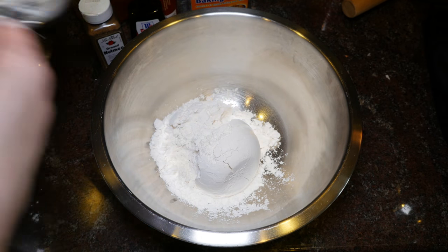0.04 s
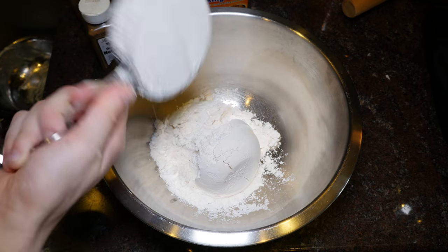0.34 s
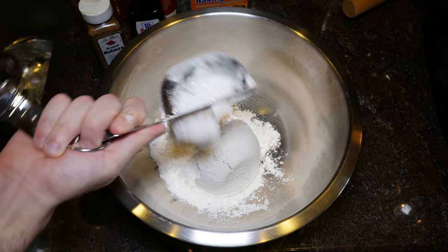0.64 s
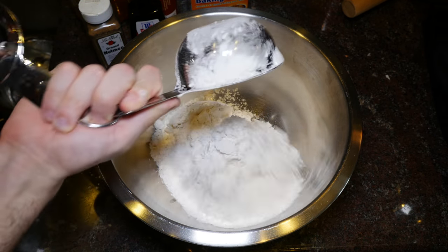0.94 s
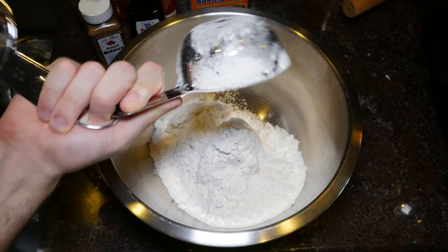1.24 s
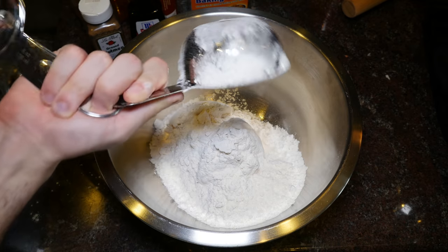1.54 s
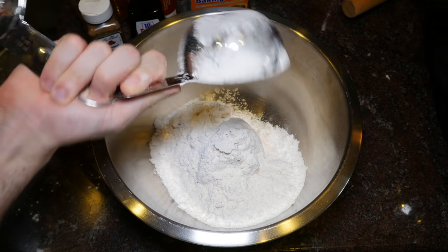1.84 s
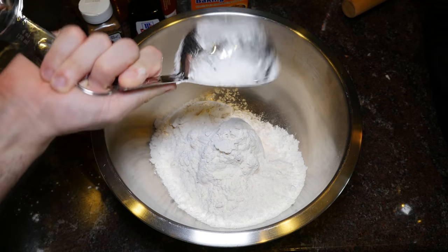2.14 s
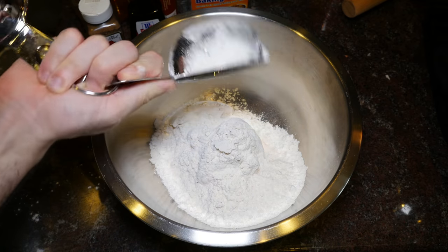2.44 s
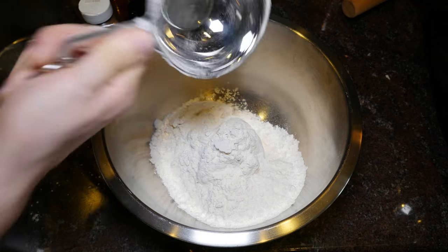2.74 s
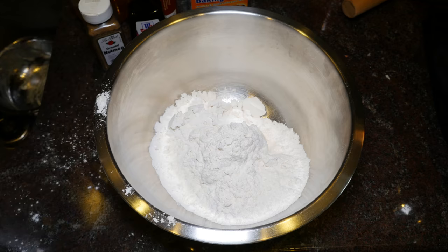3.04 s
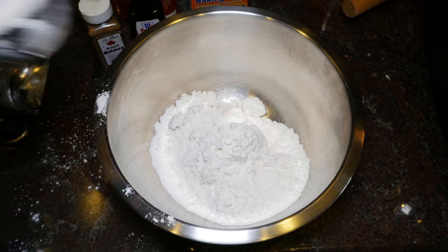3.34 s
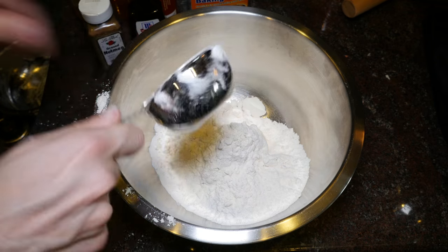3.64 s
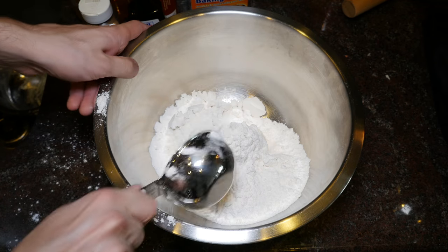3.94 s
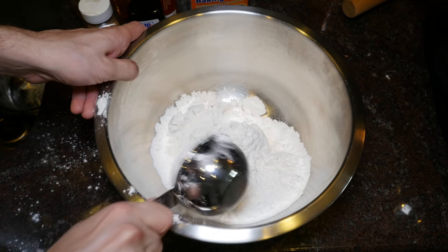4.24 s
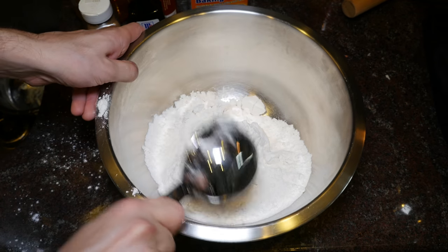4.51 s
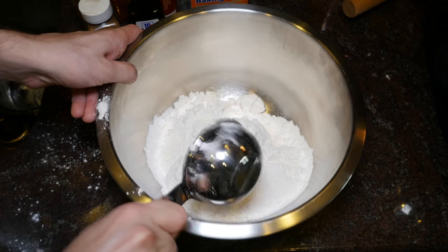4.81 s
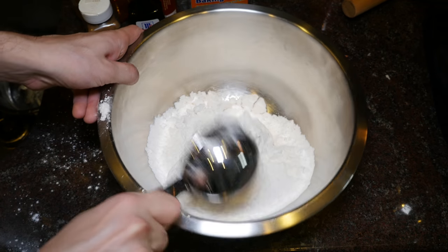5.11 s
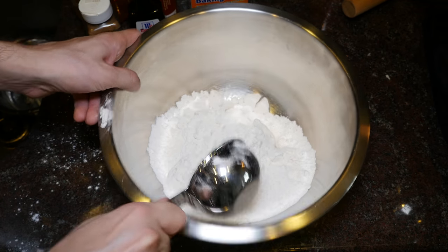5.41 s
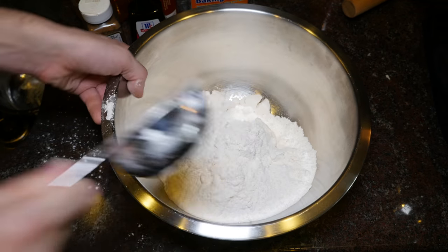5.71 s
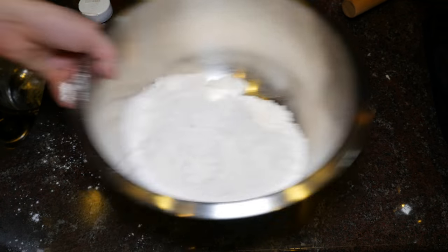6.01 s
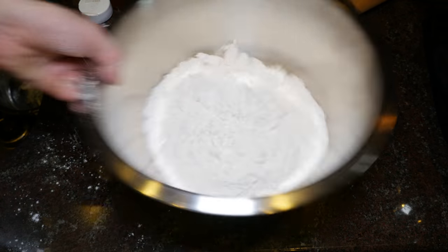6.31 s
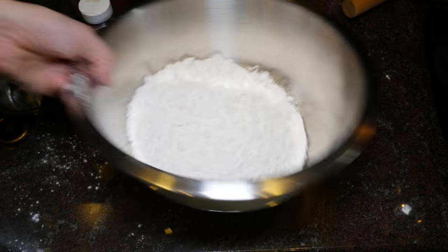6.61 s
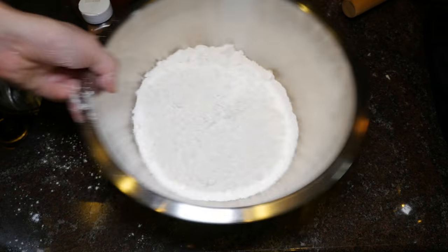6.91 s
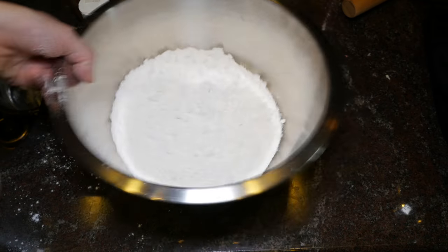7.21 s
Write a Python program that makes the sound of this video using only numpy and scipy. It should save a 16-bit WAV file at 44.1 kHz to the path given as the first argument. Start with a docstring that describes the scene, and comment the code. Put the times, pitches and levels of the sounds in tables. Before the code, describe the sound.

Light clinks of a shaken measuring cup, then fast, loud clanks on a steel bowl and a faint swish of flour.

```python
"""Flour into a steel mixing bowl.

Flour hisses from a metal measuring cup and lands in soft thuds; the cup rattles as it is shaken empty.
A smaller cup raps the rim quickly: the thin wall clanks and rings, damped by a steadying hand.
The bowl rocks back, then is swirled and the flour slides. A fan hums behind it all;
the kitchen echoes the blows, and a limiter ducks under the loud raps."""
import sys
import numpy as np
from scipy import signal
from scipy.io import wavfile
from scipy.ndimage import uniform_filter1d, minimum_filter1d

SR = 44100
rng = np.random.default_rng(int(sys.argv[2]) if len(sys.argv) > 2 else 0)


def dump_mix(stems):
    """Bounce the given channels to the path in sys.argv[1] as a 16-bit WAV at rate SR."""
    frames = np.atleast_2d(stems).T  # one column per channel
    limited = np.clip(frames, -1, 1)  # hard clip at full scale
    pcm = np.round(limited * 32767).astype(np.int16)
    wavfile.write(sys.argv[1], SR, pcm)


N = 328986
TIME = np.arange(N) / SR

# fan air noise: freq_hz, density_db
FAN_SPECTRUM = [(25, -27), (60, -16), (95, -10.5), (150, -8), (240, -1), (400, -4.5), (600, -2), (820, -11),
                (1300, -15), (2300, -22.5), (4200, -29), (7500, -32), (10500, -29), (16000, -38)]
# fan hum: freq_hz, level_db
FAN_HUM = [(57, -75.5), (232, -64.5), (380, -66), (1370, -75.5), (1890, -74.5)]
# fan, left-right: freq_hz, coherence
FAN_COHERENCE = [(60, 1), (300, 0.98), (1000, 0), (3000, 0), (12000, 0.3)]

# kitchen echoes, left-right: freq_hz, coherence
ROOM_COHERENCE = [(100, 1), (300, 1), (600, .3), (1200, .15), (3000, 0.1), (6000, .4), (12000, 0.83)]
# kitchen decay: freq_hz, t60_s
ROOM_DECAY = [(120, .5), (500, 0.51), (1300, 0.48), (4000, 0.62), (9000, 0.44), (15000, 0.53)]
# echo colour: freq_hz, gain_db
ROOM_SPECTRUM = [(100, 0.28), (250, 0.84), (600, 0.97), (1200, 0.073), (2500, 0.98), (5000, 0.96),
                 (10000, 0.15), (15000, 0.19)]

# flour leaving a tilted cup: centre_s, length_s, level_db
POURS = [(0.672, 0.12, -67), (.81, 0.2, -63.5), (0.972, .15, -64.5), (2.707, 0.054, -73),
         (2.833, 0.51, -67), (2.875, 0.048, -59), (3.68, .4, -66), (3.998, 0.37, -65.5)]
# flour hiss: freq_hz, density_db
FLOUR_SPECTRUM = [(1500, -6.5), (3500, -7.5), (5000, -5.5), (6700, 1.5), (8500, -7), (10800, 1.5),
                  (13000, -8.5), (16000, -8.5)]
# falling flour and handling: start_s, level_db
SOFT_BLOWS = [(0.847, -39.5), (2.777, -41), (2.939, -47), (3.048, -49), (7.35, -49)]
# bowl and counter under a soft blow: freq_hz, level_db, t60_s
THUD_MODES = [(150, -11, 0.12), (240, -7.5, 0.11), (290, -2.5, 0.067), (379, -1, 0.061), (574, -11, 0.016)]

# shaken cup clinking at its handle: start_s, tick_db, cup_db
CUP_CLINKS = [(0.7707, -50, -48), (1.2062, -44.5, -64), (1.292, -31.5, -35), (1.3589, -31.5, -51),
              (1.4053, -55, -47.5), (1.4924, -35.5, -55), (1.51, -31.5, -52), (1.552, -54, -48),
              (1.6368, -35.5, -50), (1.647, -31.5, -60), (1.6964, -38, -44.5), (1.7608, -32, -46),
              (1.7938, -31, -55), (1.847, -28, -38.5), (1.8981, -33.5, -49), (1.918, -58, -42.5),
              (1.936, -34.5, -49), (1.9762, -33, -41), (2.0297, -42, -47.5), (2.0672, -33.5, -47),
              (2.108, -38.5, -42), (2.1657, -29, -48.5), (2.2313, -35.5, -46), (2.2964, -26.5, -57),
              (2.354, -43, -44), (2.521, -52, -47.5)]
# cup ring: freq_hz, level_db, t60_s
CUP_MODES = [(1493, -5.5, 0.096), (3090, -9, 0.082), (3195, -8, 0.044), (4660, -8.5, 0.074),
             (6470, -9, 0.06), (8200, -14, 0.054), (12200, -22, 0.062)]
# broad cup resonances: freq_hz, width_hz, gain_db
CUP_RESONANCES = [(1450, 91, 2), (1670, 310, -5.5), (2084, 85, -2.5), (3210, 140, -3), (4800, 80, -6),
                  (6600, 140, -8.5), (8580, 120, -17), (10500, 82, -16)]
# steel-on-steel tick: freq_hz, density_db
TICK_SPECTRUM = [(1200, -5.5), (2200, -3.5), (3300, 0), (4200, 5), (6500, 6.5), (8500, -1.5), (11000, 1.5),
                 (13000, -14), (16000, -23)]
# direct sound of the steel, left-right: freq_hz, coherence
STEEL_COHERENCE = [(100, 1), (1000, 0.82), (3000, 0), (12000, 0.92)]

# hand-damped bowl: freq_hz, level_db, t60_s
BOWL_MODES = [(141.8, -33, 0.55), (228, -28, 0.3), (389, -25, 0.28), (566, -24, 0.41), (697, -30, 0.63),
              (790, -22, 0.26), (1019, -15, 0.34), (1116, -20.5, 0.35), (1200, -14, 0.17),
              (1283, -28, 0.11), (1363, -27, 0.17), (1463, -28.5, 0.36), (1510, -27, 0.32),
              (1673, -45, .22), (1850, -26.5, .22), (2020, -34.5, 0.16), (2265, -33.5, 0.14),
              (2950, -41.5, 0.25), (12310, -53, 0.33)]
# bad rap, bowl hits the counter and cup glances off singing: freq_hz, level_db, t60_s
CLUNK_MODES = [(248, -28, 0.12), (309, -20.5, 0.091), (370, -17, .12), (410, -22.5, 0.11),
               (587, -22, 0.071), (737, -18.5, 0.08), (1032, -17.5, 0.13), (3120, -21.5, .05),
               (4860, -35, .22), (6180, -42, 0.59), (6700, -36.5, 0.22)]
# bowl rocking back onto its base: freq_hz, level_db, t60_s
SETTLE_MODES = [(133, -32, .3), (165, -37, .14), (105, -44, .1)]
# cup on the rim: start_s, level_db, pitch_hz, pan_db, bright_db
RIM_RAPS = [(4.080, -3.5, 1200, -2.5, -2.5), (4.244, -4.5, 1173, 0.5, -5.5), (4.414, -7, 1180, 0.5, -2),
            (4.556, -14.5, 1110, -11, -7.5), (4.578, -14.5, 1212, 6, 4.5), (4.727, -4.5, 1085, -1.5, 0.5),
            (4.893, 3.5, 1196, 0, -0.5), (5.066, 0, 1210, 0, 1.5), (5.225, -3.5, 1205, 0, -1.5),
            (5.384, -1, 1215, 0, -0.5)]
# clank of the bowl wall: freq_hz, width_hz, gain_db
CLANK_MODES = [(192, 140, -11), (380, 100, -15.5), (572, 130, -5.5), (1000, 310, -4), (1277, 370, 1),
               (2003, 630, -7), (2770, 1470, -15.5), (5054, 930, -22), (6580, 1200, -20)]
# dense, quickly damped modes of thin steel: freq_hz, density_db
CRASH_SPECTRUM = [(55, -30.5), (85, -8), (130, 10.5), (220, -15.5), (400, -9), (700, 3.5), (1200, -3),
                  (2000, -6.5), (3900, -16), (6000, -9.5), (8500, -9.5), (11000, -10.5), (15000, -27.5)]


def from_db(db):
    """Decibels to gain."""
    return 10 ** (np.asarray(db) / 20)


def unit_rms(x):
    """Scale to rms 1."""
    return x / np.sqrt(np.mean(x ** 2) + 1e-20)


def at_hz(points, hz):
    """Interpolate a table over log frequency."""
    freqs_hz, values = np.array(points).T
    return np.interp(np.log(hz), np.log(freqs_hz), values)


def add(track, start_s, sound):
    """Mix a sound in at start_s."""
    start = round(start_s * SR)
    track[..., start:start + sound.shape[-1]] += sound[..., :N - start]


def decay(t60_s):
    """Exponential fade from 1."""
    return np.exp(-np.log(1000) * TIME[:SR // 4] / t60_s)


def resonate(x, hz, width_hz):
    """Two-pole resonance, peak gain 1."""
    radius = np.exp(-np.pi * width_hz / SR)
    feedback = [1, -2 * radius * np.cos(2 * np.pi * hz / SR), radius ** 2]
    return signal.lfilter(np.array([1, 0, -1]) * (1 - radius ** 2) / 2, feedback, x + 1e-18)


def ring(modes, spread_db=0, pan_spread_db=0):
    """One blow: the struck spot sets each mode's strength and sign; each radiates to its own side."""
    hz, db, t60_s = np.array(modes).T
    t = TIME[:SR // 2]
    strength = from_db(db + spread_db * rng.standard_normal(len(db))) * rng.choice([-1, 1], len(db))
    pan = from_db(pan_spread_db * rng.standard_normal(len(db)) * [[1], [-1]])
    waves = np.exp(np.outer(-np.log(1000) / t60_s, t)) * np.sin(np.outer(2 * np.pi * hz, t))
    return (strength * pan) @ waves


def noise_bands(coherence, size):
    """White noise in half octaves: yields centre_hz, stereo band."""
    edges_hz = np.geomspace(22, 17000, 21)
    white = rng.standard_normal((2, 2, size + 4000))
    for k, (low_hz, high_hz) in enumerate(zip(edges_hz, edges_hz[1:])):
        bandpass = signal.butter(2, [low_hz, high_hz], "band", fs=SR, output="sos")
        mid, side = signal.sosfilt(bandpass, white[k % 2])[:, -size:]
        hz = np.sqrt(low_hz * high_hz)
        alike = np.clip(at_hz(coherence, hz), 0, 1)
        yield hz, np.sqrt((1 + alike) / 2) * mid + np.sqrt((1 - alike) / 2) * side * [[1], [-1]]


def shaped_noise(spectrum, coherence):
    """Stereo noise of a given spectrum, rms 1."""
    return unit_rms(sum(from_db(at_hz(spectrum, hz)) * band for hz, band in noise_bands(coherence, N)))


def roughness(depth_db, grain_samples):
    """Fast random gain flicker."""
    return from_db(depth_db * unit_rms(uniform_filter1d(rng.standard_normal(N), size=grain_samples)))


def fan(air_db=-54.5, tone_width_hz=14):
    """Dull air noise with a few unsteady tones."""
    hum = sum(from_db(db) * unit_rms(resonate(rng.standard_normal(N), hz, tone_width_hz))
              for hz, db in FAN_HUM)
    return from_db(air_db) * shaped_noise(FAN_SPECTRUM, FAN_COHERENCE) + hum


def kitchen_echoes(x, early_db=-2.5, late_db=-4.5, early_t60_s=0.081, gap_s=0.0013):
    """Quick reflections off bowl and counter, then the room tail, dying band by band."""
    t = TIME[:SR * 3 // 5]
    response = np.zeros((2, len(t)))
    for hz, band in noise_bands(ROOM_COHERENCE, len(t)):
        power = 0
        for db, t60_s in [(early_db, early_t60_s), (late_db, at_hz(ROOM_DECAY, hz))]:
            rate_per_s = np.log(1e6) / t60_s
            power += from_db(db) ** 2 * np.exp(-rate_per_s * t) * rate_per_s / SR
        response += from_db(at_hz(ROOM_SPECTRUM, hz)) * np.sqrt(power) * band
    onset = np.clip(t / gap_s - 1, 0, 1)
    return signal.oaconvolve(x, response * onset, axes=1)[:, :N]


def flour(swirl_start_s=5.985, swirl_rise_s=0.051, swing_hz=4.9, swirl_db=-60, turn_drop_db=6):
    """Grainy hiss of sliding powder: one swell per pour, two per swing of the bowl."""
    pour = sum(from_db(db) * np.cos(np.pi * np.clip((TIME - centre_s) / length_s, -0.5, 0.5))
               for centre_s, length_s, db in POURS)
    elapsed_s = TIME - swirl_start_s
    speed = np.abs(np.sin(2 * np.pi * swing_hz * elapsed_s))
    onset = np.clip(1 + elapsed_s / swirl_rise_s, 0, 1)
    swirl = onset * from_db(swirl_db - turn_drop_db * (1 - speed))
    grain = roughness(depth_db=1.5, grain_samples=60)
    hiss = shaped_noise(FLOUR_SPECTRUM, coherence=[(2000, 0.097), (12000, 0.69)])
    return (pour + swirl) * grain * hiss


def thuds(gain_db=-3, lumps=4, lump_gap_s=0.022, lump_loss_db=3.5):
    """Soft, crumbling blows wake only the lowest modes."""
    out = np.zeros((2, N))
    for start_s, db in SOFT_BLOWS:
        for k in range(lumps):
            delay_s = k * lump_gap_s * rng.uniform(0.8, 1.2)
            gain = from_db(db + gain_db - k * lump_loss_db)
            add(out, start_s + delay_s, gain * ring(THUD_MODES, spread_db=1.5))
    return out


def cup_rattle(body_gain_db=6, ring_gain_db=-1, tick_gain_db=-7, rise_s=0.00082,
               rebound_s=0.044, rebound_loss_db=21):
    """Steel chatters on steel: gritty ticks shake the cup's resonances and leave a faint ring."""
    pings, shake, ticks = np.zeros((2, N)), np.zeros(N), np.zeros(N)
    chatter = decay(t60_s=0.042) * (1 - np.exp(-TIME[:SR // 4] / rise_s))
    for start_s, tick_db, cup_db in CUP_CLINKS:
        add(shake, start_s, from_db(cup_db + body_gain_db) * chatter)
        tick = from_db(tick_db + tick_gain_db) * chatter
        add(ticks, start_s, tick)
        # loose handle falls back
        add(ticks, start_s + rebound_s * rng.uniform(0.6, 1.4), from_db(-rebound_loss_db) * tick)
        ping = ring(CUP_MODES, spread_db=3, pan_spread_db=1.5)
        add(pings, start_s + rise_s, from_db(cup_db + ring_gain_db) * ping)
    grit = roughness(depth_db=3, grain_samples=40)
    force = shake * grit * rng.standard_normal(N)
    body = sum((-1) ** k * from_db(db) * resonate(force, hz, width_hz)
               for k, (hz, width_hz, db) in enumerate(CUP_RESONANCES))
    body = unit_rms(body) * force.std() / 2
    return pings + body + ticks * grit * shaped_noise(TICK_SPECTRUM, STEEL_COHERENCE)


def bowl_ring(gain_db=-4, detune=0.008, lag_s=0.0024, clunk_s=4.5575, settle_s=5.523):
    """The bowl rings after each rap, clunks once, and rocks back when the rapping stops."""
    out = np.zeros((2, N))
    for start_s, db, *_ in RIM_RAPS:
        # shifting grip detunes the modes
        modes = [(hz * (1 + detune * rng.standard_normal()), mode_db, t60_s)
                 for hz, mode_db, t60_s in BOWL_MODES]
        add(out, start_s + lag_s, from_db(db + gain_db) * ring(modes, spread_db=2.5, pan_spread_db=2.5))
    add(out, clunk_s, ring(CLUNK_MODES))
    add(out, settle_s, ring(SETTLE_MODES))
    return out


def rim_crash(crack_db=-17, crack_t60_s=0.018, crash_db=-18, crash_t60_s=0.08, lag_s=0.0005):
    """Dense modes of thin steel: a crack and a short crash of noise per rap."""
    envelope = np.zeros((2, N))
    for start_s, db, _, pan_db, bright_db in RIM_RAPS:
        sides = from_db(db + np.array([[pan_db], [-pan_db]]) / 2)
        crack = from_db(crack_db + bright_db) * decay(crack_t60_s)
        crash = from_db(crash_db) * decay(crash_t60_s)
        add(envelope, start_s + lag_s, sides * (crack + crash))
    return envelope * shaped_noise(CRASH_SPECTRUM, STEEL_COHERENCE)


def rim_clank(drive_db=36, base_pitch_hz=1210, lobe_db=0.5, lag_s=0.00076):
    """The rapped wall's broad modes swell and die within milliseconds, treble first."""
    out = np.zeros((2, N))
    impulse = signal.unit_impulse(SR // 10)
    for start_s, db, pitch_hz, pan_db, bright_db in RIM_RAPS:
        sides = from_db(db + np.array([[pan_db], [-pan_db]]) / 2)
        for k, (hz, width_hz, mode_db) in enumerate(CLANK_MODES):
            centre_hz = hz * pitch_hz / base_pitch_hz
            wave = resonate(resonate(impulse, centre_hz, width_hz), centre_hz, width_hz)
            tilt_db = at_hz([(1200, 0), (5000, bright_db)], hz)
            gain = from_db(drive_db + mode_db + tilt_db)
            # neighbouring modes radiate to opposite sides
            sign = (-1) ** k
            lobes = from_db(sign * np.array([[-lobe_db], [lobe_db]]))
            add(out, start_s + lag_s, sides * lobes * sign * gain * wave)
    return out


def scene(low_cut_hz=65):
    """Close steel with kitchen echoes, flour and fan; thin steel radiates no deep bass."""
    blows = rim_clank() + rim_crash() + cup_rattle() + thuds()
    steel = blows + kitchen_echoes(blows) + bowl_ring()
    highpass = signal.butter(4, low_cut_hz, "high", fs=SR, output="sos")
    return signal.sosfilt(highpass, steel + 1e-18) + flour() + fan()


def limiter(x, ceiling_db=-0.1, release_db_per_s=8, window_samples=89):
    """Gain drops just ahead of a peak and creeps back."""
    peak_db = 20 * np.log10(np.abs(x).max(axis=0) + 1e-9)
    over_db = np.maximum(peak_db - ceiling_db, 0)
    release_db = release_db_per_s * TIME
    cut_db = np.maximum.accumulate(over_db + release_db) - release_db
    gain_db = uniform_filter1d(minimum_filter1d(-cut_db, window_samples), window_samples)
    return x * from_db(gain_db)


def record(dry, notch_hz=7860, cutoff_hz=15700):
    """Limiter, narrow treble notch, steep low-pass."""
    notched = signal.lfilter(*signal.iirnotch(notch_hz, Q=45, fs=SR), limiter(dry))
    lowpass = signal.ellip(10, 0.1, 90, cutoff_hz, fs=SR, output="sos")
    return signal.sosfilt(lowpass, notched)


dry = scene()
out = record(dry)
dump_mix(out)
```